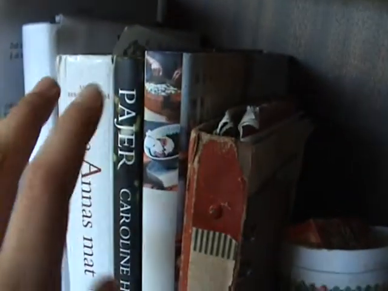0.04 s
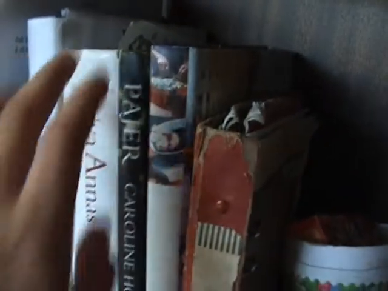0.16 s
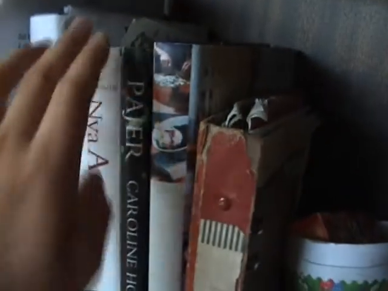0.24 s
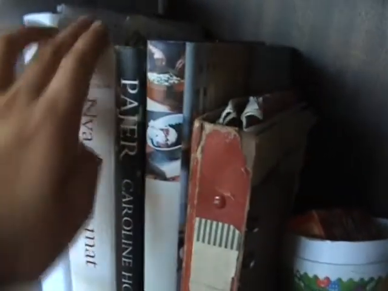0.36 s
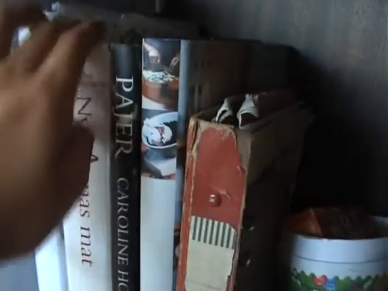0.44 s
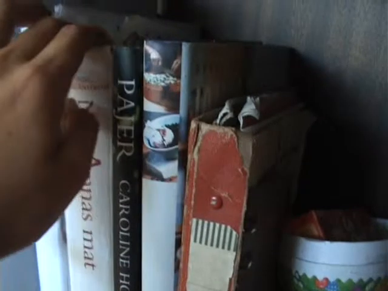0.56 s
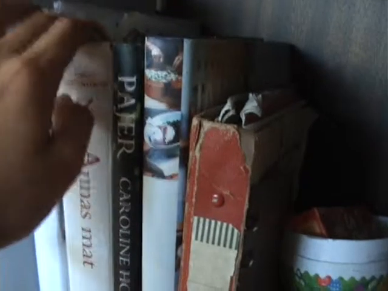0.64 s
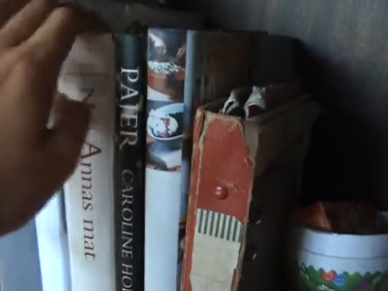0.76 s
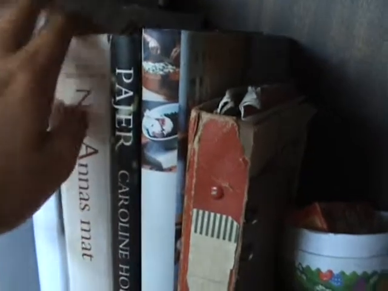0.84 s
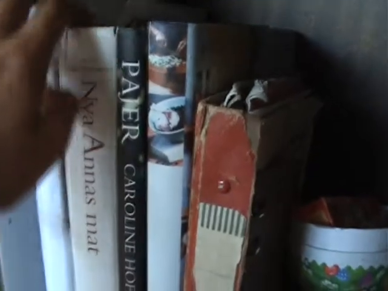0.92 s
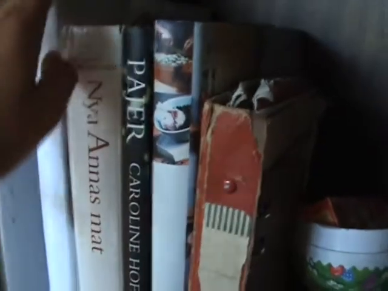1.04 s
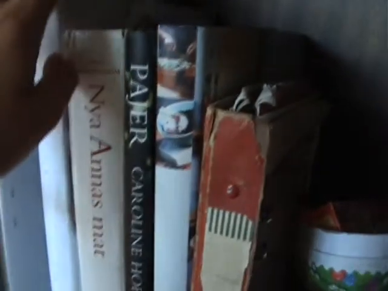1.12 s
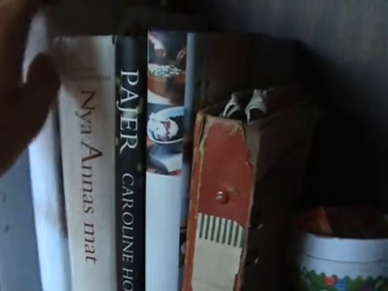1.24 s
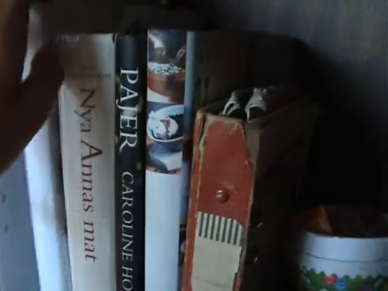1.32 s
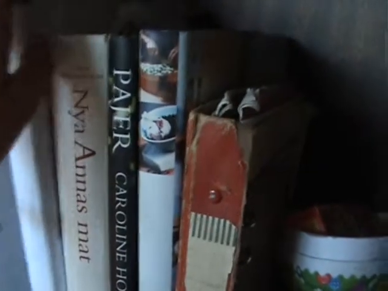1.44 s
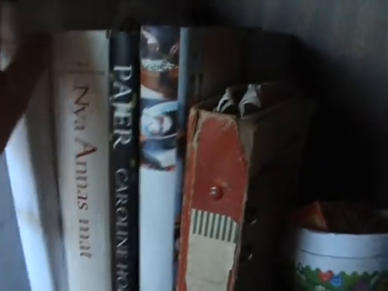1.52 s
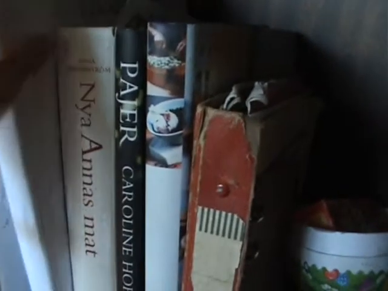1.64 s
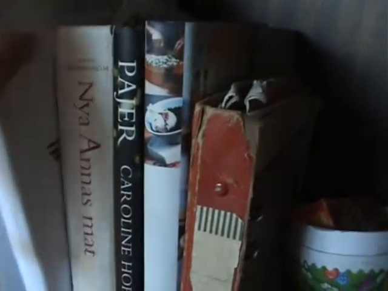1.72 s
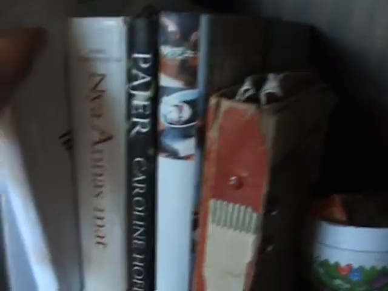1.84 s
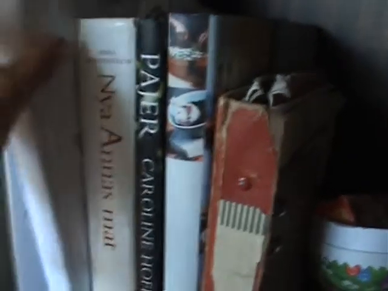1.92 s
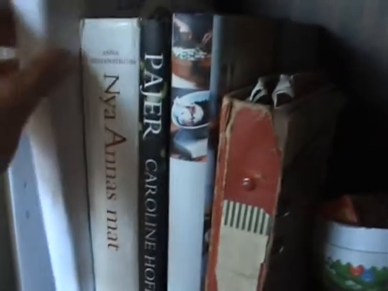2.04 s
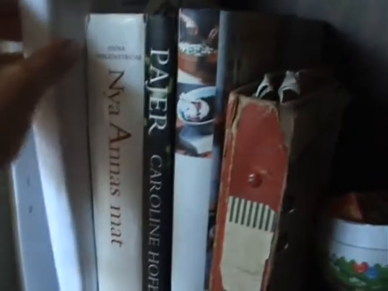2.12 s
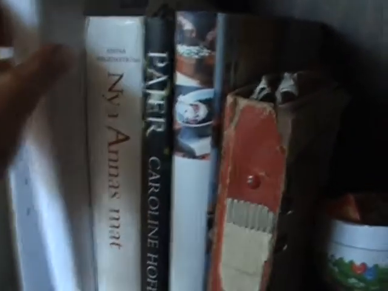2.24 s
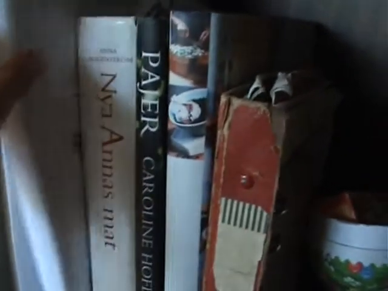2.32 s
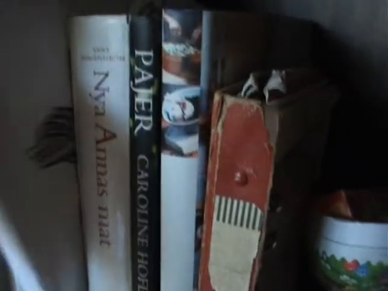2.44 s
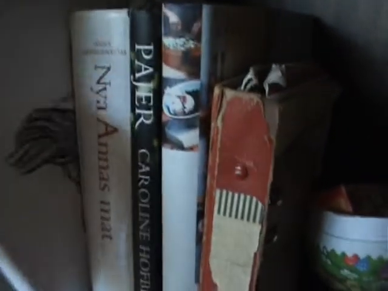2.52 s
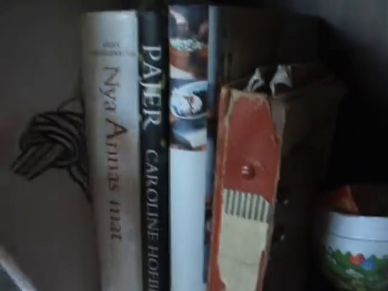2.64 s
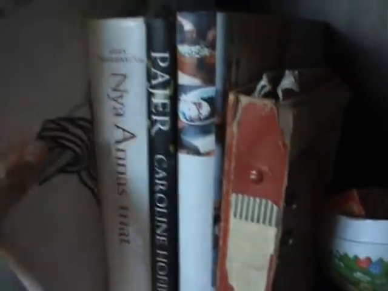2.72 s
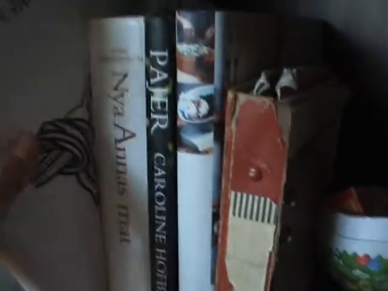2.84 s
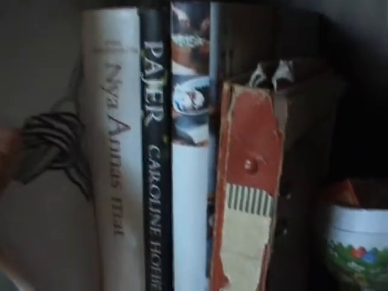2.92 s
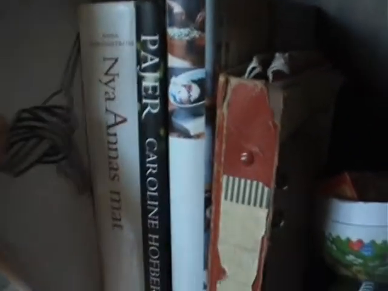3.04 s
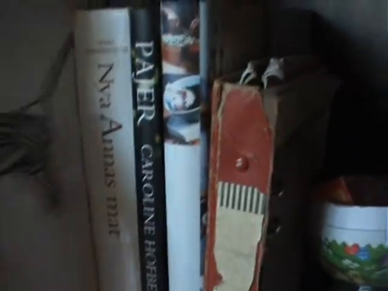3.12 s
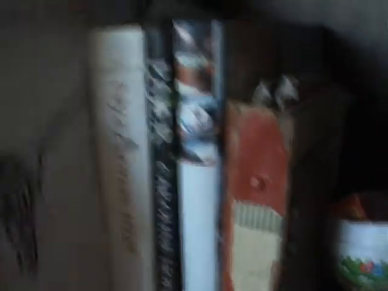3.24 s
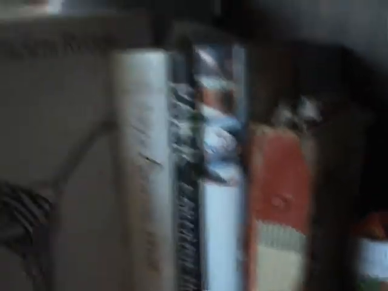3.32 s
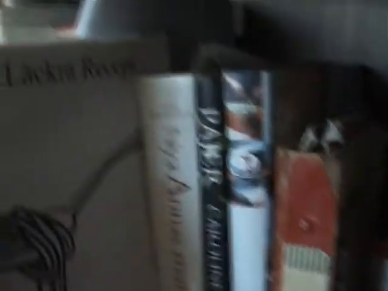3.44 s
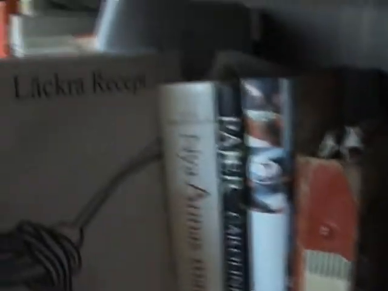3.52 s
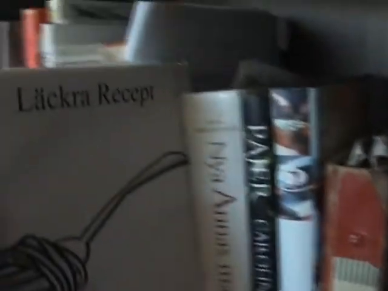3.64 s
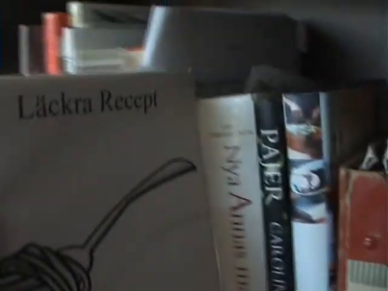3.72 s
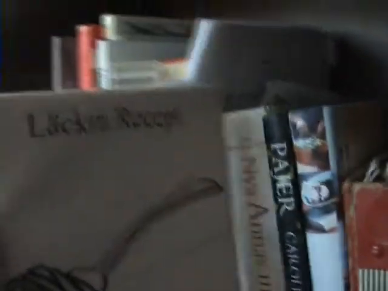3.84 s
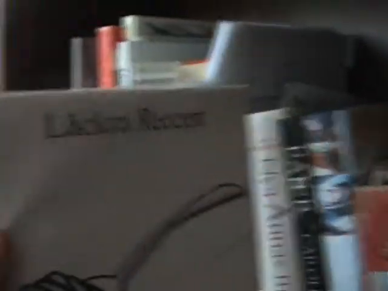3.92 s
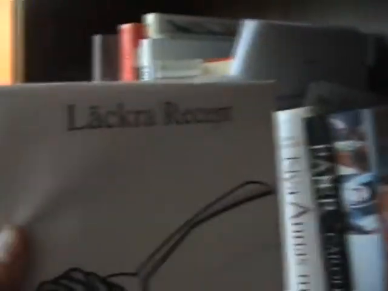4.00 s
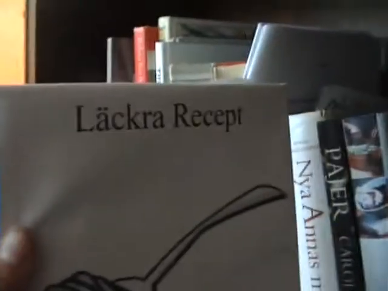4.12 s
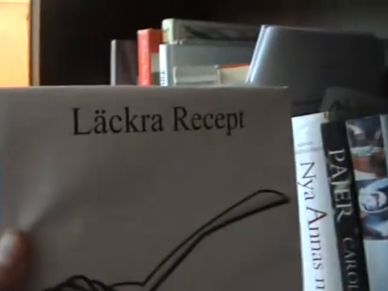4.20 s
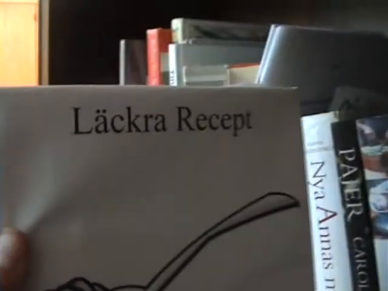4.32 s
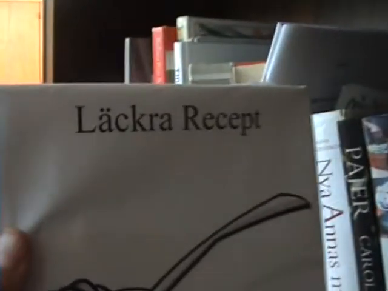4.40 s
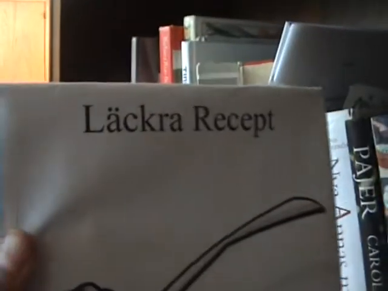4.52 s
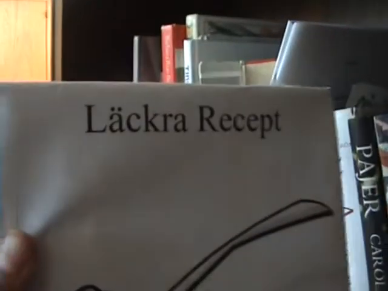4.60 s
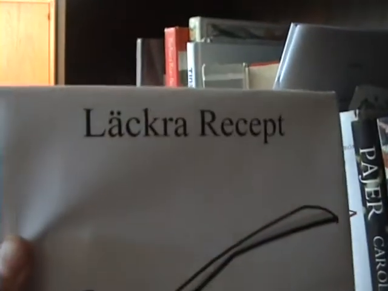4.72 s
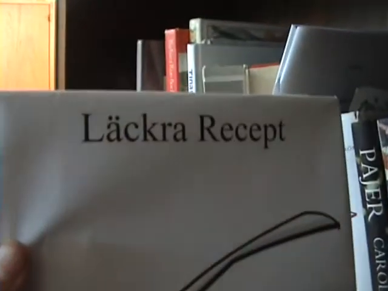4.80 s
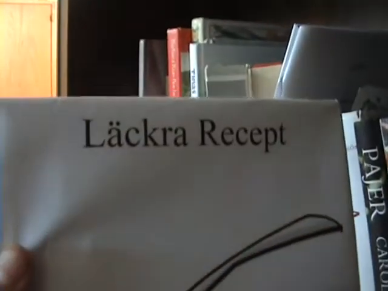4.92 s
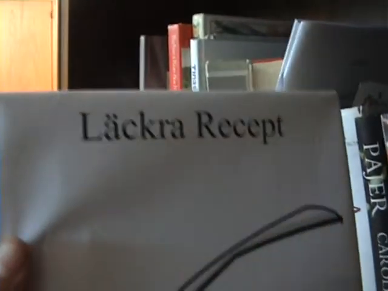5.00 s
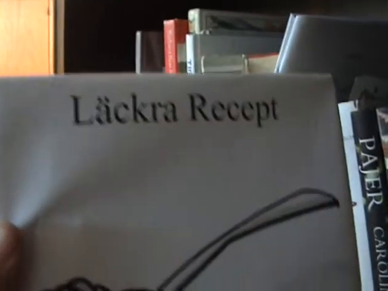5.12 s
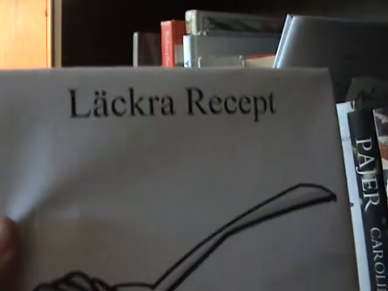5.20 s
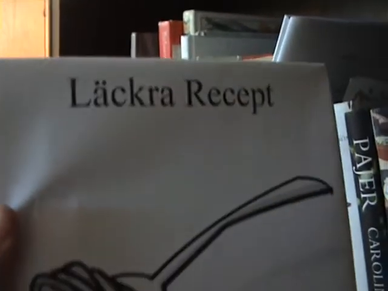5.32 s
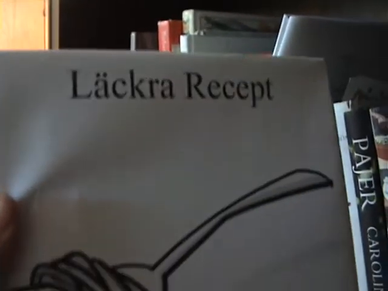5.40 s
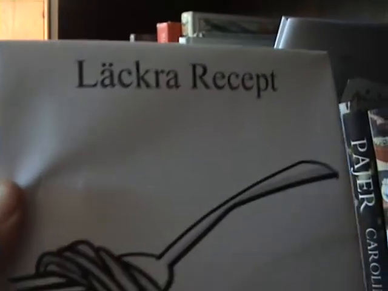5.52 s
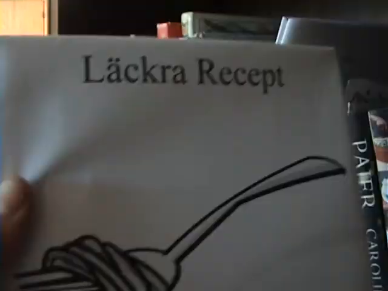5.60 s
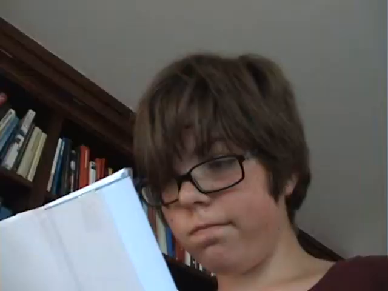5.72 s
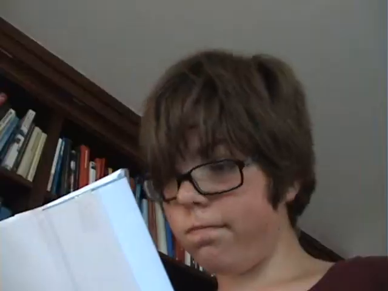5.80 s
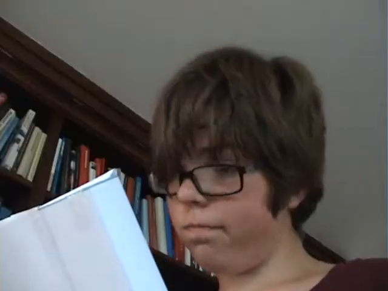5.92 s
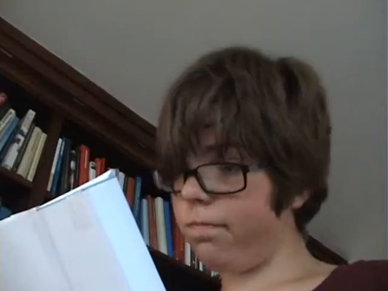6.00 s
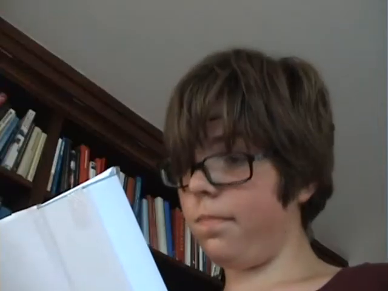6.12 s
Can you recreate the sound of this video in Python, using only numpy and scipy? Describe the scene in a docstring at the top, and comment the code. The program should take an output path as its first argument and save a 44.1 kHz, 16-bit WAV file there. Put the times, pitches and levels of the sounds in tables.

```python
"""A thin book is drawn from a shelf in a quiet room, over air, mains hum and a hand-held camera's faint noises.
From 0.45 s fingers brush the covers. From 1.3 s the book comes out in pulls, pinched at first, loose from 3 s:
its glossy cover scrapes its neighbours in tiny slips, stiff edges tick and snap, other books thud softly.
Near 3.85 s the back edge slips through the gap; by 4.15 s the last corner has brushed free.
Two faint ticks follow."""
import sys
import numpy as np
from scipy import signal
from scipy.fft import rfft, irfft, next_fast_len
from scipy.io import wavfile
from scipy.ndimage import map_coordinates

SR = 44100
rng = np.random.default_rng(int(sys.argv[2]) if len(sys.argv) > 2 else 0)


def int16_out(signal):
    """Quantize to a 16-bit WAV file."""
    q = np.round(np.clip(np.atleast_2d(signal).T, -1, 1) * 32767)
    wavfile.write(sys.argv[1], SR, q.astype(np.int16))


N = 271656

# friction spectrum of a pinched cover: f/Hz, level/dB
PINCHED_COVER = [(350, -32.5), (600, -4), (778, -5), (1050, 0), (1240, 0), (1590, 7), (2060, -1),
                 (2780, 6.5), (3020, 3.5), (3270, 4), (5290, -3.5), (6150, -6.5), (12200, -14.5),
                 (15200, -21), (15800, -28.5)]


def sliding(loose_from_s=3.0, release_s=0.087):
    """The book is pulled while pinched, runs loose, slips through the gap and brushes free."""
    # pulls: t/s, length/s, attack/s, scrape/dB, swell/dB, hiss/dB re scrape, drag/dB re scrape
    pulls = [(1.32, 0.31, 0.19, -44.5, 4.5, .5, -3.5), (1.55, 0.3786, 0.155, -41, 0.5, 0, -13.5),
             (1.962, 0.25, .06, -38.5, 14, -2, -14), (2.29, 0.46, 0.0682, -37, 7, 0, -10),
             (2.901, 0.22, 0.077, -43.5, -2.5, 0, -8.5), (3.12, .36, 0.092, -35, 7, 1.5, -10.5),
             (3.399, 0.2084, 0.026, -42.5, -5.5, 1.5, -2), (3.528, 0.36, 0.055, -37, 9, 2, -11.5)]
    # friction spectrum of the loose cover: f/Hz, level/dB
    loose_cover = [(350, -21), (600, -4.5), (856, -5.5), (982, 1), (1130, -9.5), (1240, -1.5), (1350, -6.5),
                   (1610, -7), (2390, -3.5), (3650, -1), (4130, 0.5), (7550, -4.5), (12400, -9.5),
                   (15000, -16.5), (15800, -18.5)]
    # resonances of the hollow behind the book: f/Hz, width/Hz, gain/dB
    hollow_modes = [(952.8, 147, -2), (1650, 314, 7), (5000, 610, -1.5), (6220, 150, 2)]
    # back edge passing the gap: t/s, scrape/dB, hiss/dB re scrape, drag/dB re scrape
    edge_path = [(3.836, -35, 3, -12), (3.846, -41.5, 11, -14), (3.868, -33.5, 2.5, 3),
                 (3.882, -42.5, 9, 9), (3.925, -48, -7, 16)]
    # friction spectrum in the gap: f/Hz, level/dB
    gap_spectrum = [(350, -31), (600, 2), (688, -4.5), (956, 1), (1260, -5), (1700, -1), (3700, -11.5),
                    (6490, -3), (8190, -7), (10100, -4), (15800, -26)]
    # resonances of the gap: f/Hz, width/Hz, gain/dB
    gap_modes = [(6720, 330, 5), (8100, 400, 4.5), (10200, 600, 2.5)]
    # last corner brushing free: t/s, scrape/dB, hiss/dB re scrape, drag/dB re scrape
    corner_path = [(3.945, -42, -9.5, 11), (3.963, -41, -15, 5), (3.992, -35, 5, 2), (4.031, -34, -1.5, 1),
                   (4.053, -39, -21, 2.5), (4.14, -62.5, -6, 6)]
    # friction spectrum of the corner: f/Hz, level/dB
    corner_spectrum = [(350, -38.5), (600, -7), (679, -1), (917, -15), (1270, 0.5), (1590, -12),
                       (1920, -4.5), (2740, -13), (3020, -8), (3460, -17), (4250, -12), (5580, -15.5),
                       (8650, -13), (14200, -24), (15800, -32)]
    early = [stroke(*pull, release_s) for pull in pulls if pull[0] < loose_from_s]
    late = [stroke(*pull, release_s) for pull in pulls if pull[0] >= loose_from_s]
    pinched = sum(rub(path, PINCHED_COVER, [], rough_db=0.8, scrape_db=-1.5, hiss_db=0, drag_db=0)
                  for path in early)
    loose = sum(rub(path, loose_cover, hollow_modes, rough_db=0.65, scrape_db=0.44, hiss_db=1.5,
                    drag_db=-4) for path in late)
    edge = rub(edge_path, gap_spectrum, gap_modes, rough_db=2, scrape_db=1.5, hiss_db=1, drag_db=-14.5)
    corner = rub(corner_path, corner_spectrum, [], rough_db=2.5, scrape_db=1.5, hiss_db=0.5, drag_db=-3)
    return pinched + loose + edge + corner


def stroke(start_s, length_s, attack_s, scrape_db, swell_db, hiss_db, drag_db, release_s):
    """The hand speeds up, moves on and stops: fast is bright, slow judders. Gives a path for rub."""
    rest_db, breakaway_db, breakaway_s = -21.5, 7.5, 0.11
    hiss_slope, drag_slope = 0.445, -0.3  # dB per dB of speed
    t = np.arange(0, length_s, 1 / 500)
    slack = np.maximum(1 - t / attack_s, 0) ** 2 + np.maximum(1 - (length_s - t) / release_s, 0) ** 2
    speed_db = swell_db * (t / length_s - .5) + rest_db * slack
    judder_db = drag_slope * speed_db + breakaway_db * np.exp(-t / breakaway_s)
    return np.transpose([start_s + t, scrape_db + speed_db,
                         hiss_db + hiss_slope * speed_db, drag_db + judder_db])


def rub(path, surface, modes, rough_db, scrape_db, hiss_db, drag_db, split_hz=5500, ease_s=.022):
    """Fibres catch and slip in the cover's resonances while the pages judder."""
    # spectrum of the juddering page block: f/Hz, level/dB
    page_judder = [(53, -41), (90, -3), (205, 6), (241, 2.5), (305, 2), (457, 1.5), (587, -4), (676, -8),
                   (915, -9.5), (1200, -11), (1560, -12), (2640, -120)]
    times_s, level_db, hiss_re_db, drag_re_db = np.transpose(path)
    t = np.arange(times_s[0] - ease_s, times_s[-1] + ease_s, 1 / SR)
    n = len(t)
    envelope = lambda db: amp(np.interp(t, times_s, db))
    cover_db = lambda hz: along(surface, hz) + humps(modes, hz)
    low_db = lambda hz: cover_db(hz) - 10 * np.log10(1 + (hz / split_hz) ** 8)
    high_db = lambda hz: cover_db(hz) - 10 * np.log10(1 + (split_hz / (hz + 1)) ** 8)
    scrape = spread(coloured(slips(n, rate_hz=5000, scatter_db=2.5), low_db))
    hiss = spread(coloured(slips(n, rate_hz=25000, scatter_db=3), high_db))
    drag = spread(coloured(slips(n, rate_hz=700, scatter_db=6), lambda hz: along(page_judder, hz)))
    scrape *= envelope(level_db + scrape_db)
    hiss *= envelope(level_db + hiss_re_db + hiss_db)
    drag *= envelope(level_db + drag_re_db + drag_db)
    friction = amp(rough_db * wobble(87.9, n)) * (scrape + hiss)
    # neighbouring covers reflect it over paths that change as the book moves
    echo = lambda side, delay_s: np.interp(t - delay_s * amp(0.71 * wobble(2.88, n)), t, side)
    echoes = np.array([.2 * echo(side, .0009) - .3 * echo(side, .0023) for side in friction])
    fade = np.sin(np.pi / 2 * np.clip(np.minimum(t - t[0], t[-1] - t) / ease_s, 0, 1))
    out = np.zeros((2, N))
    add(out, t[0], fade * (friction + echoes + drag))
    return out


def slips(n, rate_hz, scatter_db):
    """Two trains of tiny slips at random moments, with log-normal sizes."""
    happens = rng.random((2, n)) < rate_hz / SR
    return unit(happens * rng.choice([-1, 1], (2, n)) * amp(scatter_db * rng.standard_normal((2, n))))


def ticks(onset_s=.0018, onset_db=-8, tail_db=-26, tail_t60_s=0.13, ring_db=7, gain_db=7):
    """A tick with a very short rising onset: one sharp push rings the cover, then scatters among books."""
    # paper and card edges snapping: t/s, level/dB, body/dB, brightness/dB, ring/Hz, t60/s, leftward/dB
    snaps = [(0.458, -30, -6, -27, 1074, .013, -1), (0.482, -17, -35, -27, 1720, .013, 3.5),
             (0.581, -29, -18, -31, 1650, .01, 9), (0.831, -18, -22, -23, 1960, .013, 4),
             (0.961, -9, -32, -12, 1400, 0.02, 4), (0.974, -5, -27, -15, 1800, 0.023, -7),
             (0.98, -4.5, -34.5, -22, 2700, 0.011, 1), (1.096, -17, -30, -8, 5770, 0.013, -2),
             (1.259, -17, -46, -23, 2670, .006, -7), (1.713, -16.5, -20.5, -20, 1540, .022, 4),
             (1.885, -20.5, -17.5, -33.5, 1090, .013, 2.5), (2.006, -11.5, -47, -1.5, 9000, .007, 5),
             (2.136, -12.5, -13.5, -18, 1030, 0.0096, 2), (2.162, -14.5, -10.5, -28.5, 2600, .009, 2),
             (2.252, -17.5, -8.5, -40, 1040, 0.009, 4.5), (2.42, -18.5, -18, -13, 3360, .013, 1.5),
             (2.748, -7.5, -20, -32, 3650, 0.013, 5), (2.85, -12, -17, -32, 3500, .027, 9.5),
             (2.855, -2, -27, -35, 2490, 0.0076, 3.5), (3.108, -22, -14, -24, 966, .016, 4.5),
             (3.206, -7.5, -21, -16, 3058, 0.019, 2), (3.467, -8, -14, -31, 940, .024, -14),
             (3.687, -13, -13.5, -12.5, 1717, .02, -3.5), (3.823, -6.5, -14.5, -36, 1500, 0.012, -5),
             (3.904, -18, -15, -14, 1890, .021, -8.5), (4.082, -21, -12, -33, 1940, 0.02, -10),
             (4.407, -35, -11, -34, 1900, .025, 2), (5.493, -34.5, -13, -36.5, 1960, .016, 0)]
    # resonances of the card cover: f/Hz, width/Hz, gain/dB
    cover_modes = [(990, 95, 5.5), (1410, 160, 5.5), (1810, 160, 6.5), (2841, 460, 6), (3380, 860, 1.5),
                   (6450, 610, 3.5)]
    crispness = 0.49  # dB of treble per dB of force
    out = np.zeros((2, N))
    t = np.arange(SR // 8) / SR - onset_s
    after_s = np.maximum(t, 0)
    for start_s, level_db, body_db, bright_db, ring_hz, t60_s, pan_db in snaps:
        decay = amp(-60 * after_s / t60_s) + amp(tail_db - 60 * after_s / tail_t60_s)
        envelope = np.where(t < 0, amp(onset_db) * (1 + t / onset_s), decay)
        push = 0.28 * envelope * rng.standard_normal((2, len(t)))
        push[0, np.argmax(t >= 0)] += 1.6  # the sharp push
        spectrum = [(60, body_db - 16), (300, body_db + 17), (900, body_db + 18.5), (1500, -2.5),
                    (4000, -3), (6700, 0.32 * bright_db + crispness * level_db + 6),
                    (11000, bright_db + 11.5), (15500, bright_db + 2)]
        modes = cover_modes + [(ring_hz, 0.18 * ring_hz, ring_db)]
        snap = spread(coloured(push, lambda hz: along(spectrum, hz) + humps(modes, hz)))
        pan = amp([[pan_db / 4], [-pan_db / 4]])
        add(out, start_s, amp(level_db + gain_db) * snap / np.sqrt(len(t)) * pan)
    return out


def thuds(attack_s=0.0023, puff_db=-18, shelf_db=-12.5, shelf_hz=125):
    """A book tips against another: damped modes and a puff from its pages; deep bumps ring the shelf."""
    # books bumping each other and the shelf: t/s, level/dB, f/Hz
    bumps = [(1.028, -29, 222), (1.144, -23.5, 260), (1.424, -30, 209), (1.719, -22.5, 217.4),
             (2.136, -19.5, 596), (2.147, -20, 178.3), (2.252, -27.5, 290), (2.754, -27, 450),
             (2.863, -23.5, 210), (2.958, -31, 287), (3.052, -27, 398), (3.157, -28, 188.2),
             (3.188, -25.5, 456), (3.283, -23, 465), (3.309, -25, 278), (3.417, -12, 440),
             (3.427, -11, 138.6), (3.461, -14.5, 108), (3.822, -12.5, 530), (3.862, -23, 224),
             (3.908, -14, 285), (4.032, -20, 301)]
    # modes of the shelf board: f/Hz, level/dB, t60/s
    board_modes = [(74, -1.5, 0.22), (101.57, 1.5, 0.31), (129, 1, 0.14)]
    book_modes = [(.6, -16), (1, -0.5), (1.6, -10.5)]  # f/pitch, level/dB
    out = np.zeros((2, N))
    t = np.arange(SR // 3) / SR
    board = sum(amp(db - 60 * t / t60_s) * np.sin(2 * np.pi * hz * t) for hz, db, t60_s in board_modes)
    for start_s, level_db, pitch_hz in list(bumps) + jostles():
        t60_s = 0.03347 * (250 / pitch_hz) ** 0.41  # higher thuds die sooner
        envelope = (1 - np.exp(-(t / attack_s) ** 2)) * amp(-60 * t / t60_s)
        knock = sum(amp(db) * np.sin(2 * np.pi * pitch_hz * ratio * t + rng.uniform(0, 2 * np.pi))
                    for ratio, db in book_modes)
        lowpass_db = lambda hz: -10 * np.log10(1 + (hz / (2 * pitch_hz)) ** 4)
        puff = amp(puff_db) * spread(coloured(rng.standard_normal((2, len(t))), lowpass_db))
        shelf = amp(shelf_db) * board / (1 + (pitch_hz / shelf_hz) ** 4)
        add(out, start_s, amp(level_db) * (knock * envelope + puff * np.sqrt(envelope) + shelf))
    return coloured(out, lambda hz: along([(20, -39.5), (45, -4), (80, 0)], hz))


def jostles(count=10, span_s=(.45, 4.1), level_db=-42, scatter_db=2, pitch_hz=260):
    """Faint random bumps while the hand works: t/s, level/dB, f/Hz."""
    times_s = np.interp((np.arange(count) + rng.random(count)) / count, [0, 1], span_s)
    return [(start_s, level_db + scatter_db * force, pitch_hz * np.exp(.3 * detune))
            for start_s, (force, detune) in zip(times_s, rng.standard_normal((count, 2)))]


def fingers(attack_s=0.017, release_s=0.0318, swell_db=1.5):
    """Short light strokes over the covers as the hand finds and changes its hold."""
    # finger strokes: t/s, length/s, scrape/dB, hiss/dB re scrape, drag/dB re scrape
    touches = [(0.45, 0.11, -51.5, -3, 0), (0.543, .075, -51.5, -3, -2.5), (0.628, 0.18, -60, -10, 1.5),
               (.82, 0.071, -49, -3.5, -3), (0.934, 0.14, -43.5, -7, -9.5), (1.065, 0.1, -46, -0.5, -13.5),
               (1.143, 0.0668, -48.5, -3, 0), (1.29, 0.26, -63, -16.5, 8.5), (1.913, 0.062, -51.5, -2, -16),
               (2.191, 0.13, -59, -2, -0.5), (2.741, 0.18, -52, 1, -2.5), (3.083, 0.108, -49, -4, -3.5)]
    paths = [stroke(start_s, length_s, attack_s, scrape_db, swell_db, hiss_db, drag_db, release_s)
             for start_s, length_s, scrape_db, hiss_db, drag_db in touches]
    return sum(rub(path, PINCHED_COVER, [], rough_db=2.11, scrape_db=-2.5, hiss_db=-1, drag_db=-.5)
               for path in paths)


def alcove(x, t60_s=0.076, build_s=0.0014):
    """Nearby boards and spines throw back a dense, very short echo, different on each side."""
    t = np.arange(SR // 20) / SR
    echo = rng.standard_normal((2, len(t))) * amp(-60 * t / t60_s) * (1 - np.exp(-t / build_s))
    return signal.fftconvolve(x, echo / np.linalg.norm(echo[0]), axes=1)[:, :N]


def room(x):
    """A small furnished room: each frequency dies at its own speed."""
    # reverberation time: f/Hz, t60/s
    decay_times = [(100, 0.25), (1000, 0.38), (4000, 0.067), (14000, 0.17)]
    hz, t, noise = signal.stft(rng.standard_normal((2, SR // 2)), SR, nperseg=256)
    decay = amp(-60 * t / along(decay_times, hz)[:, None])
    tail = signal.istft(noise * decay, SR, nperseg=256)[1]
    tail = np.pad(tail / np.linalg.norm(tail[0]), ((0, 0), (SR // 200, 0)))  # 5 ms late
    return signal.fftconvolve(x.mean(0)[None], tail, axes=1)[:, :N]


def room_air(level_db=-52, mid_db=-3.5):
    """Steady air noise coloured by the camera body."""
    # air common to both sides: f/Hz, level/dB
    mid_spectrum = [(15, -11), (25, -3), (86, -2.5), (194, -1), (269, -6.5), (299, -1), (324, -2.5),
                    (361, -5.5), (769, -8), (881, -7), (1510, -15.5), (2730, -15.5), (7630, -18.5),
                    (13800, -30), (15800, -34)]
    # air opposite on the two sides: f/Hz, level/dB
    side_spectrum = [(15, -70), (25, -31.5), (64, -28), (107, -11.5), (235, -10.5), (425, -9.5), (587, -8),
                     (812, -11.5), (881, -11.5), (1220, -13.5), (1550, -18), (3220, -20.5), (5670, -27.5),
                     (6490, -27.5), (15800, -44)]
    # resonances of the camera body: f/Hz, width/Hz, gain/dB
    casing_modes = [(997, 67, 4), (1254.5, 74.3, 9.5), (1997, 550, 4.5), (3530, 500, 1.5),
                    (4440, 470, -2.5), (6450, 610, 2.5), (7890, 430, 2)]
    mid = amp(mid_db) * shaped_noise(mid_spectrum, casing_modes)
    side = shaped_noise(side_spectrum, casing_modes)
    return amp(level_db) * np.array([mid + side, mid - side])


def hum(gain_db=-2.5, waver_db=1.5):
    """Mains hum and the camera's constant whine: tones that waver slightly in level and phase."""
    # hum and whine tones: f/Hz, level/dB
    tones = [(99, -68), (200, -67.5), (300, -64.5), (600, -71.5), (900, -69.5), (4500, -80), (4800, -76),
             (5100, -77), (9600, -88.5), (15750, -77)]
    t = np.arange(N) / SR
    out = np.zeros((2, N))
    for hz, db in tones:
        peak = np.sqrt(2) * amp(db + gain_db + waver_db * wobble(2, N))
        phase_rad = 0.122 * wobble(2.57, N) + rng.normal(0, 0.69, (2, 1))
        out += peak * np.sin(2 * np.pi * hz * t + phase_rad)
    return out


def handling(rest_db=-69.5, moved_db=-59):
    """The camera rumbles softly in the hand that holds it, more while it is moved."""
    # camera in motion: start/s, end/s
    moves = [(.3, 1.73), (2.8, 3.9)]
    rumble = shaped_noise([(20, -17), (45, 3), (70, 3.5), (120, -1), (250, -26.5)])
    moving = sum(during(*span_s, ease_s=0.24) for span_s in moves)
    return amp(rest_db + (moved_db - rest_db) * moving) * rumble


def flutter(rate_hz=25, level_db=-60):
    """The camera's electronics rasp faintly once per picture."""
    t = np.arange(N) / SR
    cycle = (t * rate_hz + .38) % 1 - .5
    bursts = amp(level_db) * np.exp(-(cycle / .16) ** 2)
    rasp = shaped_noise([(1700, -36.5), (2100, -11), (2800, -0.5), (3500, -3.5), (3900, -16), (7000, -60)])
    return rasp * bursts * during(0, 5.85, ease_s=0.023)


def whine(ease_s=0.093):
    """A thin camera whine comes and goes, hopping between pitches."""
    # spells of whine: start/s, end/s, f/Hz, level/dB
    spells = [(0, .3, 5100, -77.5), (0, 0.252, 4200, -71.5), (4.147, 4.65, 4500, -75),
              (4.65, 5.25, 4200, -71.5)]
    t = np.arange(N) / SR
    return sum(amp(db) * during(start_s, end_s, ease_s) * np.sqrt(2) * np.sin(2 * np.pi * hz * t)
               for start_s, end_s, hz, db in spells)


def spread(pair):
    """Two unrelated signals become one wide source a little to the left, at rms 1."""
    # left-right likeness: f/Hz, correlation
    correlation = [(60, 1), (300, 1), (700, 1), (1500, 0.943), (3100, 0.833), (7000, 0.99), (15000, 0.7697)]
    # left over right: f/Hz, level/dB
    lean = [(100, -1.5), (700, 2), (2400, 3.5), (4400, 2.5), (8000, -1), (15000, 0.5)]
    likeness = lambda hz: np.clip(along(correlation, hz), 0, .99)
    side = coloured(pair[1], lambda hz: 10 * np.log10((1 - likeness(hz)) / (1 + likeness(hz))))
    left = coloured(pair[0] + side, lambda hz: along(lean, hz) / 2)
    right = coloured(pair[0] - side, lambda hz: -along(lean, hz) / 2)
    return unit(np.array([left, right]))


def coloured(x, gain_db):
    """x through the minimum-phase filter with response gain_db(hz)."""
    n = x.shape[-1]
    n_fft = 2 * next_fast_len(n // 2 + 2048)
    gain = amp(gain_db(np.fft.rfftfreq(n_fft, 1 / SR)))
    cepstrum = irfft(np.log(np.maximum(gain, 1e-6)))
    cepstrum[1:n_fft // 2] *= 2
    cepstrum[n_fft // 2 + 1:] = 0
    return irfft(rfft(x, n_fft) * np.exp(rfft(cepstrum)), n_fft)[..., :n]


def shaped_noise(spectrum, modes=()):
    """Noise at rms 1 with a spectrum (f/Hz, level/dB) and resonances."""
    return unit(coloured(rng.standard_normal(N), lambda hz: along(spectrum, hz) + humps(modes, hz)))


def along(points, hz):
    """(f/Hz, value) points read on a log axis."""
    knots_hz, values = np.transpose(points)
    return np.interp(np.log(hz + 1), np.log(knots_hz + 1), values)


def humps(modes, hz):
    """The dB that resonances add at each frequency."""
    return sum(db / (1 + (2 * (hz - centre_hz) / width_hz) ** 2) for centre_hz, width_hz, db in modes)


def wobble(rate_hz, n):
    """A smooth random curve with rate_hz knots a second."""
    knots = rng.standard_normal(int(n * rate_hz / SR) + 4)
    return map_coordinates(knots, [np.arange(n) * rate_hz / SR])


def during(start_s, end_s, ease_s):
    """A 0-to-1 gate with ramps centred on its ends."""
    t = np.arange(N) / SR
    return np.clip(.5 + np.minimum(t - start_s, end_s - t) / ease_s, 0, 1)


def add(track, start_s, sound):
    """Mix a sound into the track."""
    start = round(start_s * SR)
    part = sound[..., :N - start]
    track[:, start:start + part.shape[-1]] += part


def amp(db):
    """Decibels to gain."""
    return 10 ** (np.asarray(db) / 20)


def unit(x):
    """Scaled to rms 1."""
    return x / np.sqrt(np.mean(x ** 2) + 1e-20)


def scene():
    """The books are close, so the shelf answers more than the room."""
    books = fingers() + sliding() + ticks() + thuds()
    echoes = amp(-13) * alcove(books) + amp(-20) * room(books)
    background = (room_air() + hum()) * amp([[.8], [-.8]])  # slightly left
    return books + echoes + background + flutter() + whine() + handling()


def record(dry):
    """The camera keeps nothing above its band limit."""
    top_hz = 15900
    n_fft = next_fast_len(N + 8192)
    passband = np.fft.rfftfreq(n_fft, 1 / SR) < top_hz
    return irfft(rfft(dry, n_fft) * passband, n_fft)[:, :N]


dry = scene()
out = record(dry)
int16_out(out)
```